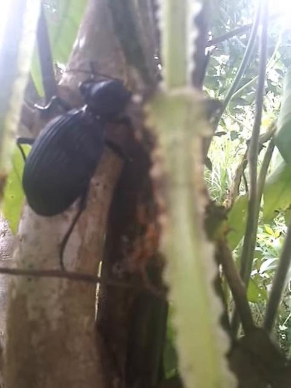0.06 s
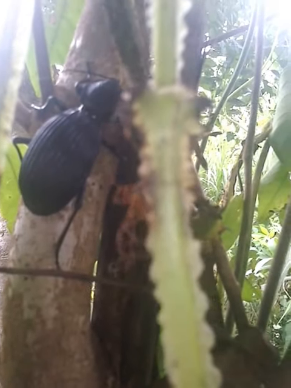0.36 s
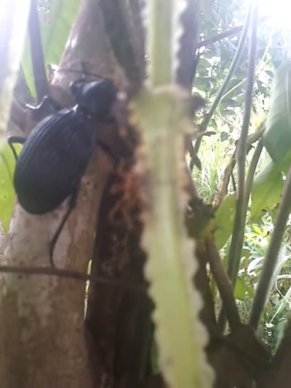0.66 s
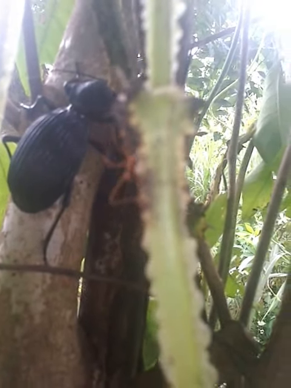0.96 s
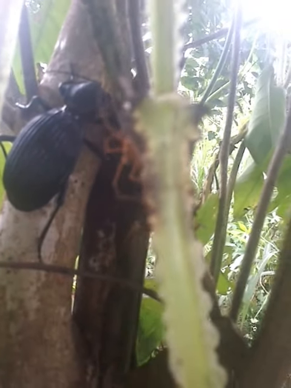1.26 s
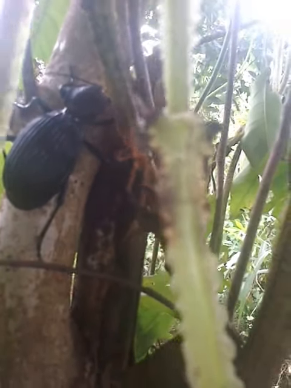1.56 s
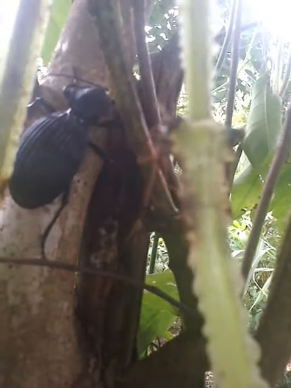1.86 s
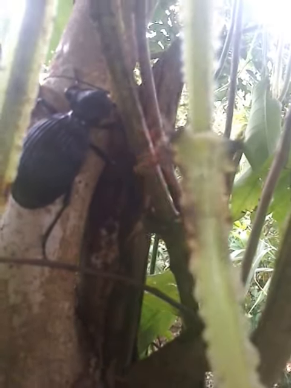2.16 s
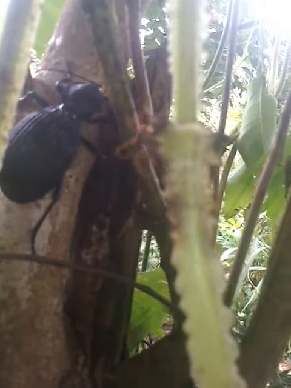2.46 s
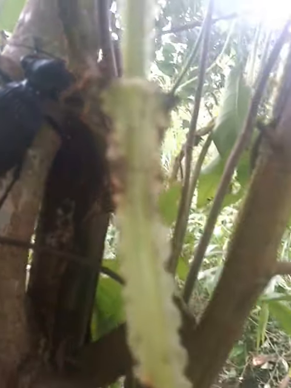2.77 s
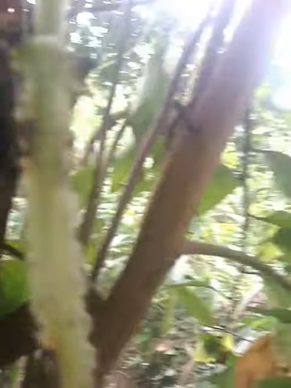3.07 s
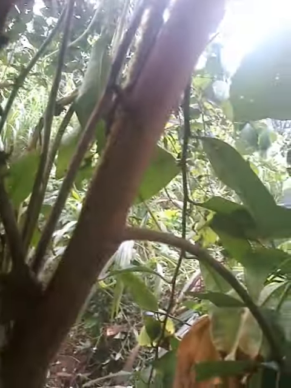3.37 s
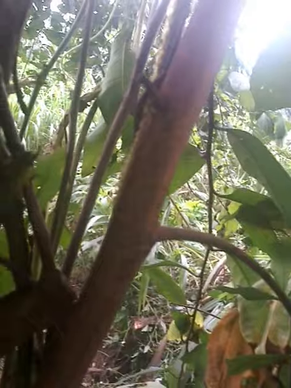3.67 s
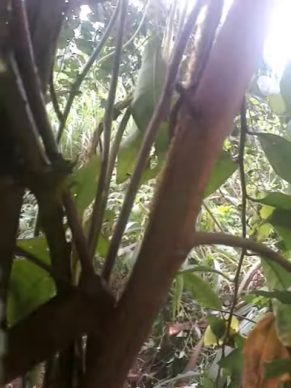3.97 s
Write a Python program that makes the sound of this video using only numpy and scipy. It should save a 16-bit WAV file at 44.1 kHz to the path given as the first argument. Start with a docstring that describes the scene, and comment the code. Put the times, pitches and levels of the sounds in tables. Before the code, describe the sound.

Twigs snap and leaves brush right against a handheld microphone moving through plants outdoors. Soft handling thuds and a stem stuttering on the left lead to the loudest cracks near the end, over a faint steady hiss.

```python
"""Outdoors, deep among stems and leaves, on the two microphones of a hand-held camera pushed through.
Right at the microphones, twigs snap against the body, leaves rub along it, and a stem stutters and
slides past the left port. The grip creeps on the case in soft thuds.
Behind this lie a few faint bird calls and a steady background hiss."""
import sys
import numpy as np
from scipy import signal
from scipy.fft import rfft, irfft, next_fast_len
from scipy.io import wavfile
from scipy.ndimage import uniform_filter1d, map_coordinates

SR = 44100
rng = np.random.default_rng(int(sys.argv[2]) if len(sys.argv) > 2 else 0)


def dump_mix(stems):
    """Bounce the given channels to the path in sys.argv[1] as a 16-bit WAV at rate SR."""
    frames = np.atleast_2d(stems).T  # one column per channel
    limited = np.clip(frames, -1, 1)  # hard clip at full scale
    pcm = np.round(limited * 32767).astype(np.int16)
    wavfile.write(sys.argv[1], SR, pcm)


N = 176400

# The steady background hiss. Each row: frequency in Hz, gain in dB.
HISS_COLOUR = [(25, -1), (60, 2), (130, 10.5), (280, 2), (750, -8.5), (1500, -22.5), (2800, -9.5),
               (5300, -6), (7300, -18), (10000, -10.5), (12800, -5), (15500, -11)]
# Its out-of-phase part over its in-phase part. Each row: frequency in Hz, side over mid in dB.
HISS_SIDE = [(60, 2), (120, -8), (480, 4.5), (1300, 6), (3770, 2.5), (7520, 11.5), (15000, 6.5)]
# A far bird. Each row: start and length in seconds, first and last pitch in Hz, relative level in dB.
WHISTLES = [(3.23, 0.161, 1132, 1224, -51), (3.951, 0.1, 1120, 1185, -52)]
# A small bird, nearer. Each row: start in seconds, relative level in dB.
CHIRPS = [(.946, -56), (.996, -57), (1.028, -54), (1.545, -58), (1.628, -54)]

# The tone of each kind of contact at the microphones. Each row: frequency in Hz, gain in dB.
GRIP_COLOUR = [(100, -14.5), (450, 5.5), (1200, 3.5), (2400, 1), (3800, -13.5), (7000, -10), (16000, -52)]
LEAF_COLOUR = [(100, -10), (500, 9.5), (1300, 5.5), (2800, 10), (4200, 5), (5500, -6), (7000, -10),
               (13000, -7), (16000, -65)]
RUB_COLOUR = [(30, -39), (100, -3.5), (230, 3), (520, 2.5), (800, -4), (1300, -16), (3000, -11.5),
              (16000, -84)]
SCRAPE_COLOUR = [(100, -14), (600, -12.5), (1000, -2), (2100, 0), (2900, 1), (5500, 0), (7000, -9.5),
                 (9500, -9), (12700, -1.5), (16000, -9)]
SLIDE_COLOUR = [(100, -4.5), (1400, -10.5), (2400, 0), (4700, 3.5), (7500, -22.5), (13000, -9),
                (16000, -24)]
CRACKLE_COLOUR = [(6000, -45), (13500, 0)]
PORT_COLOUR = [(100, -8.5), (500, -6.5), (1300, -14.5), (2250, 6), (3250, 0.5), (4300, 8.5), (5100, -0.5),
               (6500, -21.5), (9000, -29.5), (13000, -12.5), (16000, -33)]
CASE_COLOUR = [(80, -26), (250, -18), (360, -30.5), (540, -11), (740, -19), (1000, -11.5), (1450, -9.5),
               (2050, 8.5), (2500, 6), (2950, 7), (3800, 5.5), (4850, -1), (5450, 6), (7000, -17.5),
               (8800, -20.5), (10300, -12.5), (13000, -9.5), (16000, -18)]
# Leaves rubbing, leaves scraping, the stem sliding. Each row: time in seconds, relative level in dB.
RUB_LEVEL = [(.1, -60), (.16, -47.5), (.2, -37.5), (.225, -61), (.85, -90), (1.42, -54), (1.7, -62.5),
             (2.0, -58), (2.4, -69.5), (2.85, -54), (2.97, -60), (3.09, -49), (3.25, -42.5), (3.34, -46.5),
             (3.39, -35.5), (3.44, -50), (3.465, -41), (3.49, -62), (3.62, -59.5), (3.66, -44.5),
             (3.72, -61.5)]
SCRAPE_LEVEL = [(.1, -52), (.18, -51), (.2, -43.5), (.23, -58), (.4, -59), (.9, -60.5), (1.42, -55),
                (1.7, -59.5), (1.85, -51), (2.4, -60.5), (2.8, -52.5), (2.95, -55.5), (3.05, -50.5),
                (3.08, -44.5), (3.2, -39.5), (3.31, -47), (3.4, -44.5), (3.44, -50), (3.465, -46),
                (3.49, -57.5), (3.62, -53.5), (3.66, -49.5), (3.79, -57.5), (3.89, -47), (3.97, -55.5)]
SLIDE_LEVEL = [(1.76, -78), (1.89, -52), (1.94, -62), (2.02, -43), (2.09, -53.5), (2.28, -52), (2.36, -64),
               (2.45, -102), (2.49, -54), (2.55, -48.5), (2.61, -43), (2.66, -47), (2.72, -88)]
# Soft thuds on the case, mostly the grip creeping; the first row, at 0.198 s, is a twig knocking dully against
# the case. Each row: start in seconds, relative level in dB, pitch in Hz, tick weight in dB.
GRIP_THUDS = [(.198, -30.5, 540, 2.5), (.241, -37, 262, -2.5), (0.4537, -37, 383, -10),
              (0.4858, -36, 354, -13), (.568, -38.5, 376, -9.5), (.631, -29.5, 350, -13.5),
              (0.7703, -33.5, 236, -12.5), (.969, -27.5, 304, -7), (1.024, -30, 256, -3),
              (1.053, -29, 298, -5.5), (1.1013, -31.5, 266, -1), (1.153, -35, 274, -1),
              (1.177, -33, 240, -3), (1.237, -29.5, 545, -20), (1.2437, -36, 366, -4.5),
              (1.3155, -29, 270, -7), (1.4165, -33, 283, -0.5), (1.486, -33, 260, -5.5),
              (1.5052, -36.5, 285, 0), (1.5223, -33, 274, -3), (1.6163, -35, 266, -14),
              (1.6533, -29.5, 272, -10), (1.817, -28.5, 282, -8.5), (1.857, -34, 258, -13),
              (1.9277, -34, 225, -7), (1.96, -32, 300, -6), (2.0048, -31.5, 244, -3.5),
              (2.036, -31.5, 229, -15), (2.776, -32.5, 306, -3), (2.851, -27, 500, -29),
              (3.2054, -28, 280, -11), (3.402, -31, 398, -4)]
# Leaf edges touching the case. Each row: start in seconds, relative level in dB.
LEAF_TICKS = [(0.0301, -29), (0.049, -30.5), (0.2126, -34.5), (0.2574, -33), (0.382, -37), (.4822, -35),
              (.701, -27.5), (0.74, -34), (3.0018, -32), (3.0141, -30), (3.084, -26.5), (3.1656, -29),
              (3.274, -32), (3.336, -32), (3.368, -31), (3.468, -43), (3.748, -36.5), (3.9042, -33.5)]
# The stem slipping at the left port. Each row: start in seconds, relative level in dB,
# brightness in dB per octave.
STEM_SLIPS = [(1.8757, -26, 0), (1.899, -17.5, 5), (1.9071, -23, -7.5), (1.9554, -25, -5),
              (1.9631, -16, 0.5), (1.9706, -16, -3), (1.9783, -19, -4), (1.993, -14, -1.5),
              (2.0008, -15, -1), (2.4605, -15, 8.5), (2.4797, -12, -0.5), (2.5315, -16.5, 6.5),
              (2.5682, -26, -1), (2.6284, -24, -8)]
# Twigs striking the case. Each row: start in seconds, relative level in dB, body and sizzle weights
# in dB, treble left over right in dB, the twig's resonance in Hz.
TWIG_SNAPS = [(0.0233, -18, -7, -29, 15, 2720), (0.1884, -20, -24, -39, 1.9, 2740),
              (0.1948, -23.5, -9.5, -38, 2.9, 2670), (0.6902, -15.5, -11, -20.5, 9.8, 2770),
              (1.7949, -28, -7.5, -14, 8.4, 4140), (2.8517, -31.5, -18, -0.5, 9, 5040),
              (2.8767, -31, -1, -2, 6, 1730), (3.0646, -25, -10.5, -16, 2.3, 1750),
              (3.1374, -29.5, 1.5, -34, 6.7, 1480), (3.2044, -3.5, -15, -17, 1.5, 3500),
              (3.562, -2, -19, -12.5, 8.5, 2960), (3.679, -16, -18.5, -8.5, 8.1, 3240),
              (3.7121, -14.5, -22, -7.5, 13.5, 3280), (3.8079, -37, -34, 2, 3, 2800),
              (3.8403, -2, -21.5, -5, 8.5, 2730), (3.9342, -28.5, -16.5, -1.5, 8, 3330)]
# How far the left port leads the right. Each row: frequency in Hz, phase in radians.
PORT_LEAD = [(100, 0), (2000, 0.62), (4000, 1.07), (8000, 3), (14000, 1.5)]

LEAD_IN_S = .0015  # a contact builds this long before its peak


def amp(db):
    """Decibels to gain."""
    return 10 ** (np.asarray(db) / 20)


def unit(x):
    """Scale to rms 1."""
    return x / np.sqrt(np.mean(x ** 2) + 1e-20)


def punch(x):
    """Scale a click to the energy of a millisecond at level 1, summed over both channels."""
    return x / np.sqrt(np.sum(x ** 2) / (SR / 1000) + 1e-20)


def along(points, hz):
    """(Hz, value) points read on a log axis."""
    knots_hz, values = np.transpose(points)
    return np.interp(np.log(hz + 1), np.log(knots_hz + 1), values)


def level(points):
    """(seconds, dB) points as a gain per sample."""
    return amp(np.interp(np.arange(N) / SR, *np.transpose(points)))


def wobble(rate):
    """A smooth random curve, rate knots a second."""
    return map_coordinates(rng.standard_normal(int(N * rate / SR) + 4), [np.arange(N) * rate / SR])


def add(out, s, x):
    """Mix x into out at s seconds."""
    i = max(0, round(s * SR))
    out[..., i:i + x.shape[-1]] += x[..., :max(0, N - i)]


def filtered(x, response):
    """Filter x by a function of frequency in Hz."""
    n = x.shape[-1]
    padded = 2 * next_fast_len(n // 2 + 2048)
    return irfft(rfft(x, padded) * response(np.fft.rfftfreq(padded, 1 / SR)), padded)[..., :n]


def ring(x, colour):
    """Let x ring through a causal filter of the given (Hz, dB) colour."""
    def minimum_phase(hz):
        cepstrum = irfft(np.log(amp(along(colour, hz))))
        half = len(cepstrum) // 2
        cepstrum[1:half] *= 2
        cepstrum[half + 1:] = 0
        return np.exp(rfft(cepstrum))
    return filtered(x, minimum_phase)


def ports(x, pan_db, split_hz=1800):
    """The left microphone port hears first, and louder in the treble; the bass is shared."""
    def response(hz):
        lean = amp(np.outer([.5, -.5], pan_db * hz ** 2 / (hz ** 2 + split_hz ** 2)))
        lag = np.outer([0, 1], along(PORT_LEAD, hz))
        return lean / lean.mean(0) * np.exp(-1j * lag)
    return filtered(x, response)


def contact(rise_s, t60, grit, tail_db, tail_t60, apart):
    """One touch at both ports: a push amid tiny fractures and a faint tail, even across the spectrum."""
    t = np.arange(SR // 20) / SR - LEAD_IN_S
    decay = amp(-60 * abs(t) / t60) + amp(tail_db - 60 * abs(t) / tail_t60)
    envelope = np.where(t < 0, np.exp(-abs(t) / rise_s), decay)
    burst = envelope * (rng.standard_normal(len(t)) + apart * rng.standard_normal((2, len(t))))
    burst *= grit / np.linalg.norm(burst[0])
    burst[:, np.argmin(abs(t))] += 1  # the push
    def flatten(hz):
        power = np.mean(abs(rfft(burst, 2 * (len(hz) - 1))) ** 2, axis=0)
        return abs(uniform_filter1d(power, size=110)) ** -.5
    return filtered(burst, flatten)


def friction(colour, rate, spread_db, smooth, apart):
    """Tiny random slips, rate a second, over smooth noise, striking the two ports unequally; rms 1."""
    sizes = amp(spread_db * np.minimum(rng.exponential(size=N), 3)) * rng.choice([-1, 1], N)
    slips = unit((rng.random(N) < rate / SR) * sizes)
    drive = (slips + smooth * rng.standard_normal(N)) * (1 + apart * rng.standard_normal((2, N)))
    return unit(ring(drive, colour))


def background_hiss():
    """Steady hiss over a low murmur of foliage; its treble is largely out of phase between channels."""
    def mid_and_side(hz):
        return amp(along(HISS_COLOUR, hz) + np.outer([0, 1], along(HISS_SIDE, hz)))
    mid, side = filtered(rng.standard_normal((2, N)), mid_and_side)
    drifting_db = -56.5 + 2.1 * wobble(rate=2.75)
    return amp(drifting_db) * np.array([mid + side, mid - side]) / np.std(mid)


def bird_call(s, length_s, from_hz, to_hz, db):
    """One whistled glide with a slightly unsteady pitch."""
    out, progress = np.zeros(N), np.linspace(0, 1, int(length_s * SR))
    hz = (from_hz + (to_hz - from_hz) * progress) * (1 + .025 * wobble(rate=900)[:len(progress)])
    envelope = np.sqrt(abs(np.sin(np.pi * progress)))
    add(out, s, amp(db) * envelope * np.sin(2 * np.pi * np.cumsum(hz) / SR))
    return out


def birds(echo_t60=0.32):
    """Left of centre: far rising whistles, blurred by the foliage, and nearer short falling chirps."""
    far = sum(bird_call(*row) for row in WHISTLES)
    near = sum(bird_call(s, length_s=.016, from_hz=5600, to_hz=4950, db=db) for s, db in CHIRPS)
    t = np.arange(SR // 3) / SR
    tail = rng.standard_normal((2, len(t))) * amp(-60 * t / echo_t60)
    echo = signal.fftconvolve(far[None], tail / np.linalg.norm(tail[0]), axes=1)[:, :N]
    return (far + near + echo) * amp([[2], [-3]])


def grip(fade_cycles=1.18, flex_rise_s=0.0014, overtone_ratio=1.45, overtone_db=-9):
    """On the case: each creep of the fingers, and one dull twig knock, is a dull tick and a low flex, gone in
    about two cycles."""
    out, t = np.zeros((2, N)), np.arange(SR // 20) / SR
    for s, db, hz, tick_db in GRIP_THUDS:
        phase = 2 * np.pi * hz * t
        modes = np.sin(phase) + amp(overtone_db) * np.sin(overtone_ratio * phase)
        flex = -modes * np.exp(-(t * hz / fade_cycles) ** 2) * (1 - np.exp(-t / flex_rise_s))
        touch = contact(rise_s=0.00015, t60=0.003, grit=0.87, tail_db=-13, tail_t60=0.079, apart=0.49)
        add(out, s, amp(db + 2) * flex)
        add(out, s - LEAD_IN_S, amp(db + tick_db + 3) * punch(ring(touch, GRIP_COLOUR)))
    return ports(out, pan_db=7)


def leaves(clump_db=2.5):
    """Along the body: whole leaves rub with a low grainy rumble and a dry scrape; their edges tick."""
    rub = friction(RUB_COLOUR, rate=450, spread_db=3.5, smooth=0.35, apart=0.52)
    scrape = friction(SCRAPE_COLOUR, rate=500, spread_db=6.5, smooth=1, apart=0.77)
    out = level(RUB_LEVEL) * rub + level(SCRAPE_LEVEL) * scrape
    out *= unit(amp(clump_db * wobble(rate=130)))  # the leaves catch and let go
    for s, db in LEAF_TICKS:
        touch = contact(rise_s=0.000067, t60=0.0021, grit=1, tail_db=-15.5, tail_t60=0.068, apart=1)
        add(out, s - LEAD_IN_S, amp(db - 1) * punch(ring(touch, LEAF_COLOUR)))
    return ports(out, pan_db=4)


def stem(crackle_db=-8):
    """Right on the left port: a stem catches and slips, and slides with a hiss and a fine crackle."""
    hiss = friction(SLIDE_COLOUR, rate=2000, spread_db=9, smooth=1, apart=0.66)
    crackle = friction(CRACKLE_COLOUR, rate=110, spread_db=7, smooth=0, apart=0.6)
    out = level(SLIDE_LEVEL) * (hiss + amp(crackle_db) * crackle)
    for s, db, tilt in STEM_SLIPS:
        colour = [(hz, port_db + tilt * np.clip(np.log2(hz / 3000), -1, 1))
                  for hz, port_db in PORT_COLOUR]
        slip = contact(rise_s=0.0001, t60=0.0041, grit=0.83, tail_db=-18, tail_t60=0.052, apart=0.35)
        add(out, s, amp(db - 5) * punch(ring(slip, colour)))
    return ports(out, pan_db=17)


def twigs(resonance_gain=.7, q=6, body_hz=1400, sizzle_hz=6500):
    """Hard against the case: twigs crack, each with its own resonance and share of body and sizzle."""
    out = np.zeros((2, N))
    for s, db, body_db, sizzle_db, pan_db, twig_hz in TWIG_SNAPS:
        def resonance(hz):
            damping = 1j * hz * twig_hz
            return 1 + resonance_gain * damping / (q * (twig_hz ** 2 - hz ** 2) + damping)
        strike = contact(rise_s=0.00026, t60=0.0015, grit=2.15, tail_db=-17, tail_t60=0.015, apart=0.49)
        crack = filtered(ring(strike, CASE_COLOUR), resonance)
        body = filtered(crack, lambda hz: 1 / (1 + (hz / body_hz) ** 8))
        sizzle = filtered(crack, lambda hz: 1 - 1 / (1 + (hz / sizzle_hz) ** 12))
        middle = crack - body - sizzle
        snap = punch(middle) + amp(body_db + 6.5) * punch(body) + amp(sizzle_db + 6) * punch(sizzle)
        add(out, s - LEAD_IN_S, amp(db - 2.5) * ports(snap, pan_db))
    return out


def scene(low_cut_hz=24):
    """Close handling, its deep bass shed by the microphones, in front of the birds and the hiss."""
    handling = twigs() + stem() + leaves() + grip()
    return filtered(handling, lambda hz: 1j * hz / (low_cut_hz + 1j * hz)) + birds() + background_hiss()


def record(dry, top_hz=15900):
    """The camera clips at full scale and keeps nothing above its band limit."""
    return filtered(np.clip(dry, -1, 1), lambda hz: 1 / (1 + (hz / top_hz) ** 120))


dry = scene()
out = record(dry)
dump_mix(out)
```